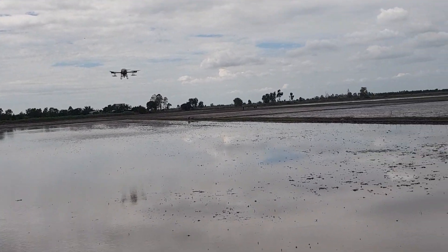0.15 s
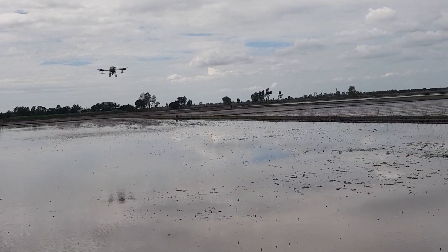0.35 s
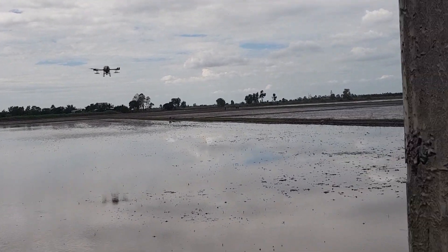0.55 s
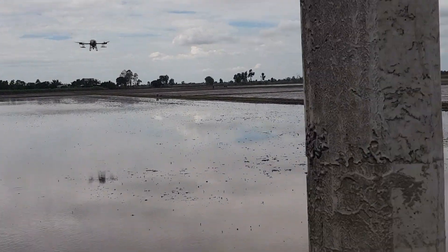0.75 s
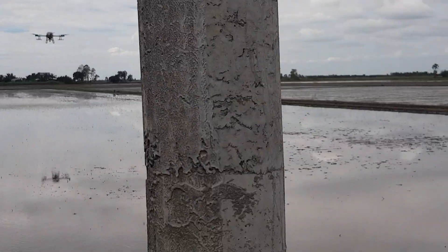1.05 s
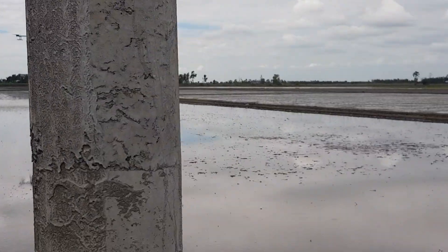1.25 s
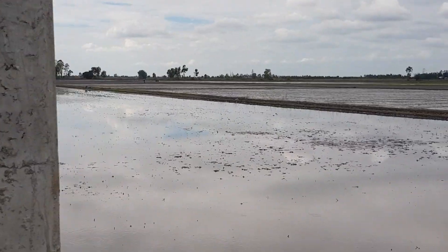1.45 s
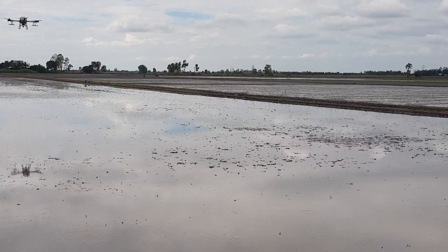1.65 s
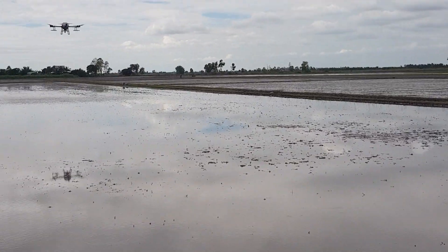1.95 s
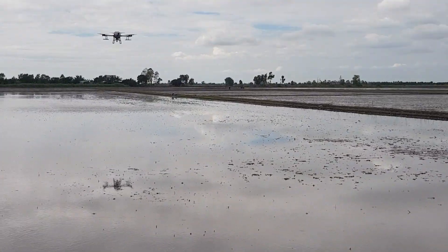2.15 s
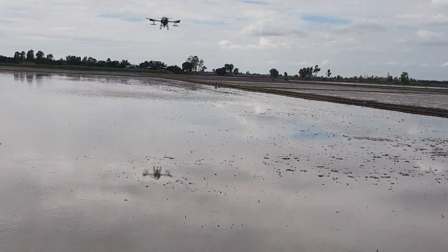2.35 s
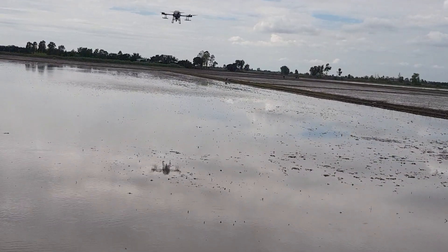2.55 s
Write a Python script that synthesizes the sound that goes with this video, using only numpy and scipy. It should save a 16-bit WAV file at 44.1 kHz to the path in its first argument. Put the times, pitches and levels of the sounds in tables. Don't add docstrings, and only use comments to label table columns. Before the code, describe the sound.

A single-cylinder engine thumps about eight times a second close by, with hiss and rattle, over a drone's hum and rotor rush; outdoors at a flooded field, handheld phone swinging towards the engine and back.

```python
import sys
import numpy as np
from scipy import signal
from scipy.io import wavfile
from scipy.ndimage import uniform_filter1d

SR = 44100
rng = np.random.default_rng(int(sys.argv[2]) if len(sys.argv) > 2 else 0)


def elevation(decibels):
    levels = np.asarray(decibels, float)
    return 10 ** (levels / 20)


def transcribe(u):
    v = np.clip(np.atleast_2d(u).T, -1, 1)
    q = np.round(v * 32767).astype(np.int16)
    wavfile.write(sys.argv[1], SR, q)


N = 119070

# start in seconds, thump level in dB, puff level in dB,
# level of the thump at the left microphone in dB.
FIRINGS = [(-0.016, -1, -55, -22), (0.108, -1.0, -39, -66), (0.235, -1.3, -39, -48),
           (0.358, -0.5, -40, -29), (0.4857, 0, -50, -20), (0.6129, 0.4, -44, -19),
           (0.7389, -0.7, -41, -13), (0.8645, 0.7, -41.5, -14.1), (0.991, -1, -44, -19.5),
           (1.116, -2, -46.5, -17), (1.244, -1.2, -55, -21), (1.3692, -2, -62, -27),
           (1.4933, -0.2, -43, -29), (1.62, -1.5, -43.5, -16), (1.7465, -1.5, -44.5, -17),
           (1.872, -0.5, -42, -30.5), (1.9969, -1.5, -39, -18), (2.125, -1, -42.5, -29),
           (2.2505, -2, -40.5, -16), (2.3774, -0.5, -39, -31), (2.503, -0.5, -43.5, -27),
           (2.6282, -3.5, -43, -23)]
# time in seconds, level in dB.
RUSH = [(0, -35), (.15, -36), (.35, -34.5), (.53, -34), (.7, -36), (.9, -35), (1.02, -38.5), (1.15, -37.5),
        (1.3, -36), (1.47, -39.5), (1.6, -37.5), (1.75, -37), (1.9, -39), (2.1, -35.5), (2.35, -37),
        (2.7, -34.5)]
RUSH_REF_DB = -38
# time in seconds, how far it is turned to the drone (0-1).
FACING = [(0, 0.61), (.5, 0.94), (.75, 0.63), (.9, 0.75), (1.0, 0.18), (1.15, 0.32), (1.6, 0.24),
          (1.9, 0.18), (2.05, 0.42), (2.2, 0.57), (2.35, 0.85), (2.7, 0.55)]


def evened(x):
    return x / np.sqrt(np.mean(x ** 2) + 1e-20)


def read(points, hz):
    f, value = np.transpose(points)
    return np.interp(np.log(hz + 1), np.log(f + 1), value)


def curve(points, t):
    return np.interp(t, *np.transpose(points))


def facing_drone(t):
    return np.clip(curve(FACING, t), 0, 1)


def add(mix, s, sound):
    k = round(s * SR)
    sound = sound[..., max(-k, 0):]
    part = mix[..., max(k, 0):][..., :sound.shape[-1]]
    part += sound[..., :part.shape[-1]]


def resonate(x, hz, width):
    turn = np.exp(2j * np.pi * np.cumsum(hz * np.ones(x.shape[-1])) / SR)
    r = np.exp(-np.pi * width / SR)
    return 2 * (turn * signal.lfilter([1 - r], [1, -r], x / turn)).real


def resonate_twice(x, hz, width):
    return resonate(resonate(x, hz, width), hz, width)


def boom(t):
    sag_db_per_s = -49
    fired = np.transpose(FIRINGS)[0]
    since = t - fired[np.searchsorted(fired, t) - 1]
    return uniform_filter1d(sag_db_per_s * (since - .06), size=600)


def blades():
    # pitch in Hz, width in Hz, level in dB, left microphone in dB.
    drone_tones = [(72.4, 15.4, -31.5, -16), (151.4, 28.5, -33.5, -10), (228.36, 5.4, -44.5, -8),
                   (282, 54, -50, -2), (334.8, 39, -49, -1), (400.3, 50, -59.5, 9), (671, 76, -59, -1),
                   (1820, 28, -63, 17), (2618, 120, -61, 18),
                   (1700, 21, -61, 14.5), (1903, 28, -64.5, 11.5), (2202, 11, -66.5, 9.5),
                    (2476, 15, -67.5, 17), (2567, 27, -64.5, 11), (2770, 37, -64.5, 19.5),
                    (4300, 48, -67, 18), (5460, 25, -73, 11), (6030, 40, -78, 14)]
    waver, waver_s = .012, .15
    turn_db, boom_top_hz = 10, 300
    out, t = np.zeros((2, N)), np.arange(N) / SR
    near_db = curve(RUSH, t) - RUSH_REF_DB + turn_db * (facing_drone(t) - 1)
    knots = np.arange(0, 3.2, waver_s)
    for hz, width, db, left_db in drone_tones:
        drift = np.interp(t, knots, rng.standard_normal(len(knots)))
        pitch = hz * (1 + waver * uniform_filter1d(drift, size=4000))
        a, b = resonate_twice(rng.standard_normal((2, N)), pitch, width)
        pair = np.array([elevation(left_db) * evened(a + 0.52 * b), evened(a)])
        out += elevation(db + near_db * (hz > 1000) + boom(t) * (hz < boom_top_hz)) * pair
    return out


def clatter():
    rise_s, fall_s, share = 0.012, 0.057, 0.25
    t, out = np.arange(round(.25 * SR)) / SR, np.zeros(N)
    shape = (1 - np.exp(-t / rise_s)) * np.exp(-t / fall_s)
    for s, _, _, left_db in FIRINGS:
        add(out, s, elevation(share * (left_db + 13.0)) * shape)
    return out


def puffs():
    rise_s, muffled_rise_s, snap_s, tail_s, tail = 0.00064, .005, 0.0066, 0.057, 0.82
    crack_gain, crack_rise_s, crack_s, crack_from_db = 1.5, 0.00035, 0.0029, -48
    t, out = np.arange(round(.2 * SR)) / SR, np.zeros(N)
    fall = np.exp(-t / snap_s) + tail * np.exp(-t / tail_s)
    crack_shape = np.minimum(t / crack_rise_s, 1) * np.exp(-t / crack_s)
    for s, _, db, _ in FIRINGS:
        puff_db = db - 4
        away = facing_drone(s) ** 2
        rise = 1 - np.exp(-t / (rise_s + muffled_rise_s * away))
        crack = crack_gain * elevation(2.1 * (puff_db - crack_from_db)) * crack_shape
        add(out, s, elevation(puff_db) * (rise * fall + (1 - away) * crack))
    return out


def microphone_colours(hz, t):
    # frequency in Hz, level in dB per Hz.
    left_low = [(40, -92), (70, -85), (110, -107), (190, -64.5), (300, -67.5), (420, -68), (600, -70),
                (1000, -67.5)]
    left_facing = [(1400, -71.5), (1800, -63), (2000, -68.5), (2250, -70), (2450, -66), (2700, -64.5),
                   (3000, -71.5), (3400, -80.5)]
    left_away = [(1400, -74.5), (1800, -74), (2000, -72), (2250, -60), (2450, -68), (2700, -70),
                 (3000, -67.5), (3400, -84)]
    left_high = [(4000, -82.5), (5000, -78), (6300, -78), (6800, -86.5), (7200, -106), (8600, -115),
                 (11300, -93), (12600, -105)]
    left_top = [(14900, -101), (15500, -112)]
    right_spectrum = [(40, -92), (70, -49.5), (110, -55), (190, -53.5), (270, -62), (500, -75.5), (700, -65),
                      (1300, -72),
                      (1500, -71), (1780, -71), (2100, -77.5), (2800, -83.5), (3200, -84), (4300, -84.5),
                 (5300, -87.5), (6500, -92.5),
                      (7100, -96.5), (7650, -102), (8600, -93.5), (9400, -85), (10000, -81), (11200, -84),
                  (13000, -90.5), (15200, -99),
                      (15350, -104), (15800, -108)]
    # frequency in Hz, lift in dB.
    turn_lift = [(3000, -0.5), (4000, 2.5), (5500, 9), (7000, 0.5), (10000, -1.5)]
    facing = facing_drone(t)
    towards = read(left_low + left_facing + left_high + left_top, hz)
    away = read(left_low + left_away + left_high + left_top, hz)
    left = np.outer(towards, facing) + np.outer(away, 1 - facing)
    left = left + np.outer(read(turn_lift, hz), facing - .5)
    right = read(right_spectrum, hz)[:, None] + 0 * left
    return np.array([left, right])


def air():
    # frequency in Hz, share of the level change.
    follow = [(200, 0.033), (1000, 0.058), (2000, 0.62), (6000, 1), (10000, 0.9)]
    # frequency in Hz, likeness (0-1).
    likeness = [(60, 0.98), (250, 0.71), (450, 0.47), (900, 0.28), (1400, 0.11), (2500, 0.22), (6000, 0.53),
                (12000, .15)]
    # time in seconds, first dip in Hz.
    bounce = [(0, 516), (.6, 480), (.8, 704), (1.1, 1110), (1.5, 1260), (1.9, 1450), (2.3, 1500),
              (2.7, 1420)]
    # frequency in Hz, level in dB.
    puff_colour = [(300, 28), (1000, 42), (2500, 34), (5000, 43.5), (8000, 47.5), (12000, 52)]
    rattle_colour = [(200, 0.5), (350, 12), (700, 3), (1300, 4), (2500, 7), (4000, 10), (7000, -3)]
    puff_left = [(3000, -11), (6000, 1.5), (9000, 7.5), (15000, -35)]
    lag_s, lag_from_hz = 0.000512, 620
    bounce_gain, bounce_fade_hz = 0.24, 1850
    flicker_db, patch_db, strand_db, trim_db = 1.14, 1.2, 2.6, -2

    shared, own = rng.standard_normal((2, 3, N))
    flicker = elevation(flicker_db * evened(uniform_filter1d(rng.standard_normal(N), size=900)))
    level = np.array([flicker, puffs(), clatter()])
    hz, t, a = signal.stft(shared * level, SR, nperseg=1024, noverlap=768)
    b = signal.stft(own * level, SR, nperseg=1024, noverlap=768)[2]
    same = np.clip(read(likeness, hz), 0, 1)[:, None]
    lag = lag_s * (1 - np.exp(-(hz / lag_from_hz) ** 2))
    b = same * a * np.exp(-2j * np.pi * hz * lag)[:, None] + np.sqrt(1 - same ** 2) * b

    patches = rng.standard_normal((len(t), len(hz), 2)).T
    patches = evened(uniform_filter1d(uniform_filter1d(patches, size=9, axis=1), size=14, axis=2))
    strands = rng.standard_normal((len(t), len(hz))).T
    strands = evened(uniform_filter1d(uniform_filter1d(strands, size=2, axis=0), size=45, axis=1))

    rush = elevation(read(follow, hz)[:, None] * (curve(RUSH, t) - RUSH_REF_DB))
    echo = bounce_gain * np.exp(-hz / bounce_fade_hz)[:, None]
    comb = abs(1 + echo * np.exp(1j * np.pi * hz[:, None] / curve(bounce, t)))
    puff = elevation(read(puff_colour, hz))[:, None]
    rattle = elevation(read(rattle_colour, hz))[:, None]
    shade = elevation(read(puff_left, hz))[:, None]
    left = b[0] * rush + b[1] * puff * shade + b[2] * rattle
    right = a[0] * rush + a[1] * puff + a[2] * rattle
    colour_db = microphone_colours(hz, t) + patch_db * patches + strand_db * strands + trim_db
    z = np.array([left, right]) * comb * elevation(colour_db) * np.sqrt(SR / 2)
    return signal.istft(z, SR, nperseg=1024, noverlap=768)[1][:, :N]


def ducked(x):
    share, width_s, top_hz, from_db = .5, .016, 600, -20
    t, dip_db = np.arange(round(.08 * SR)) / SR, np.zeros(N)
    dip = np.exp(-((t - .026) / width_s) ** 2)
    for s, _, _, left_db in FIRINGS:
        add(dip_db, s - .01, share * min(left_db - from_db, 0) * dip)
    low = signal.sosfiltfilt(signal.butter(1, top_hz, fs=SR, output="sos"), x[0])
    return np.array([x[0] + low * (elevation(dip_db) - 1), x[1]])


def knocks():
    # start in seconds, upper ring in dB, lower ring in dB.
    valve_knocks = [(0.001, -32, -43), (0.078, -34, -44), (0.234, -49, -32), (0.362, -28, -27),
                    (0.478, -28, -27.5), (0.508, -44, -35), (0.556, -30, -32), (0.614, -35, -31),
                    (0.74, -30.5, -39), (0.866, -46, -44), (1.619, -40, -41), (1.998, -36.5, -36),
                    (2.126, -52, -46), (2.251, -26.5, -40), (2.38, -49, -40), (2.504, -47, -41),
                    (2.619, -28, -53)]
    upper_hz, upper_width_hz, upper_s = 2670, 370, 0.023
    lower_hz, lower_width_hz, lower_s = 1780, 180, 0.054
    rise_s, right_db = 0.00081, -20
    t, out = np.arange(round(.12 * SR)) / SR, np.zeros(N)
    rise = 1 - np.exp(-t / rise_s)
    noise = rng.standard_normal((len(valve_knocks), 2, len(t)))
    for (s, upper_db, lower_db), (a, b) in zip(valve_knocks, noise):
        upper = evened(resonate_twice(a, upper_hz, upper_width_hz)) * np.exp(-t / upper_s)
        lower = evened(resonate_twice(b, lower_hz, lower_width_hz)) * np.exp(-t / lower_s)
        add(out, s, rise * (elevation(upper_db) * upper + elevation(lower_db) * lower))
    return out * elevation(np.array([[0], [right_db]]))


def exhaust():
    # delay in seconds, level in dB.
    pipe_echoes = [
        (0.026, -15),
        (0.066, -20),
        (0.091, -27),
    ]
    low_hz, top_hz, sweep_s = 89.2, 232.16, 0.028
    thump_db, peak_s, sharp = -9, 0.015, 3.15
    ring_db, ring_t60_s, ring_left_db = -6, 0.31, -9.5
    overtone_db, overtone_left_db, overtone_s = -33, 6, .021
    echo_left_db = -14.

    def panned(left_db):
        return elevation(np.array([[left_db], [0]]))

    t, out = np.arange(round(.25 * SR)) / SR, np.zeros((2, N))
    u = t / peak_s
    swell = u * np.exp(1.5 * (1 - u ** sharp) / sharp)
    v = (t / overtone_s) ** 2
    overtone_swell = v * np.exp(1 - v)
    vary = rng.standard_normal((len(FIRINGS), 5))
    for (s, db, _, left_db), luck in zip(FIRINGS, vary):
        opened = 1 - np.exp(-(t / (sweep_s * (1 + 0.067 * luck[0]))) ** 3)
        hz = low_hz * (1 + 0.015 * luck[1]) * (1 - opened) + top_hz * opened
        phase = 2 * np.pi * np.cumsum(hz) / SR
        wave = -np.sin(phase)
        overtone = np.sin(2 * phase) * overtone_swell * elevation(thump_db + overtone_db + 2 * luck[4])
        add(out, s, overtone * panned(overtone_left_db + 0.19 * (left_db + 14.0)))
        thump = wave * swell * elevation(thump_db + db)
        ring = wave * opened * elevation(thump_db + db + ring_db - 60 * t / ring_t60_s)
        add(out, s, thump * panned(left_db) + ring * panned(ring_left_db))
        for (delay, echo_db), echo_luck in zip(pipe_echoes, luck[2:]):
            add(out, s + delay, thump * elevation(echo_db + 2.0 * echo_luck) * panned(echo_left_db))
    return out


def scene():
    return exhaust() + ducked(blades() + air()) + knocks()


def top_cut(x):
    return signal.sosfilt(signal.butter(12, 15690, fs=SR, output="sos"), x)


def record(dry):
    # frequency in Hz, level in dB per Hz.
    quiet = [(6500, -102), (7100, -99), (8000, -100), (8600, -98), (9300, -102), (13000, -102),
             (14500, -98.5), (15200, -98), (15800, -97)]
    cut = signal.sosfilt(signal.butter(2, 42, "highpass", fs=SR, output="sos"), dry)
    hz, _, z = signal.stft(cut, SR, nperseg=2048, noverlap=1024, scaling="psd")
    band = np.arange(len(hz)) // 6
    power = np.add.reduceat(2 * abs(z) ** 2, np.arange(0, len(hz), 6), axis=1)[:, band] / 6
    loud_enough = 10 * np.log10(power + 1e-20) > read(quiet, hz)[:, None]
    kept = loud_enough | (hz < 6500)[:, None]
    out = signal.istft(z * kept, SR, nperseg=2048, noverlap=1024, scaling="psd")[1][:, :N]
    return top_cut(out)


dry = scene()
out = record(dry)
transcribe(out)
```